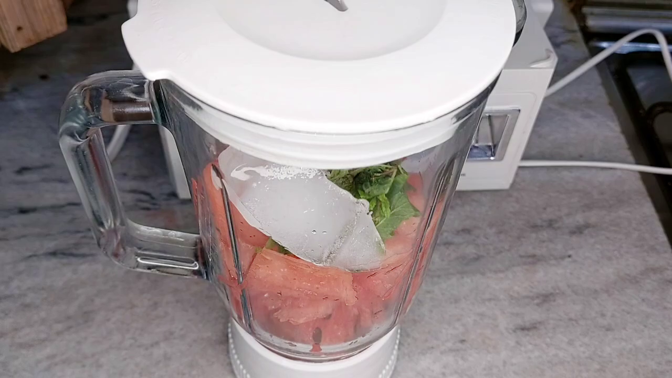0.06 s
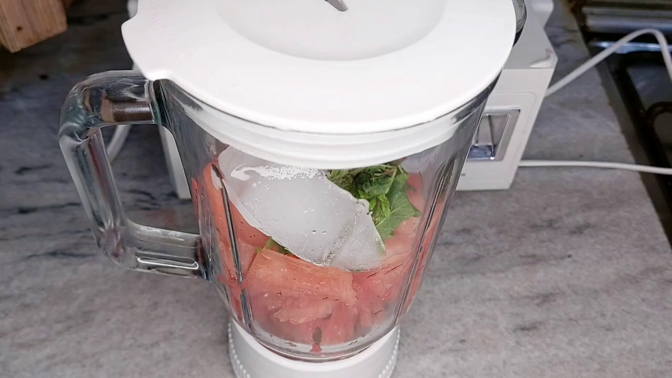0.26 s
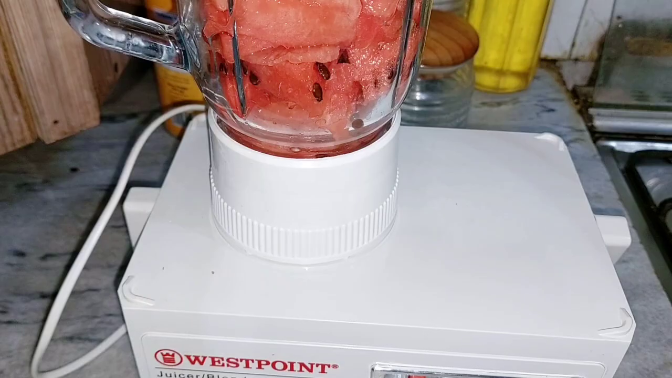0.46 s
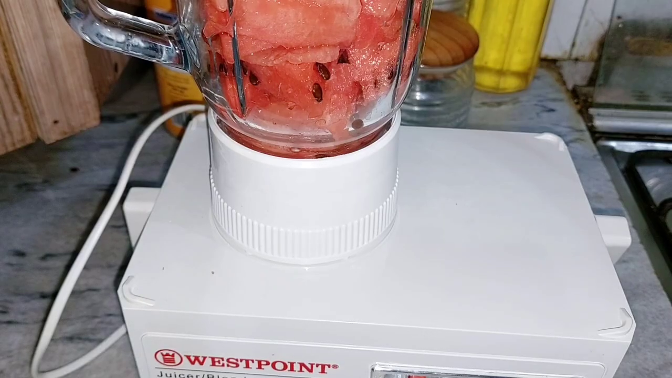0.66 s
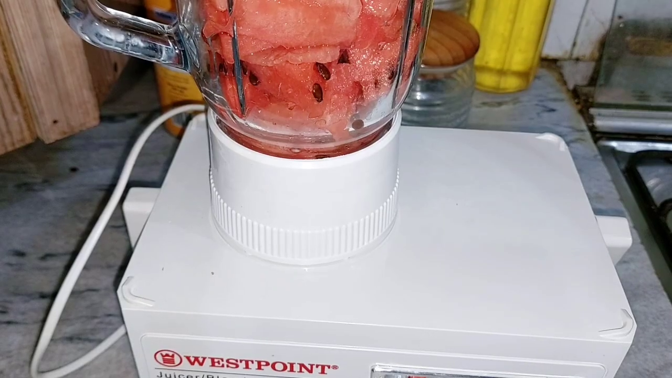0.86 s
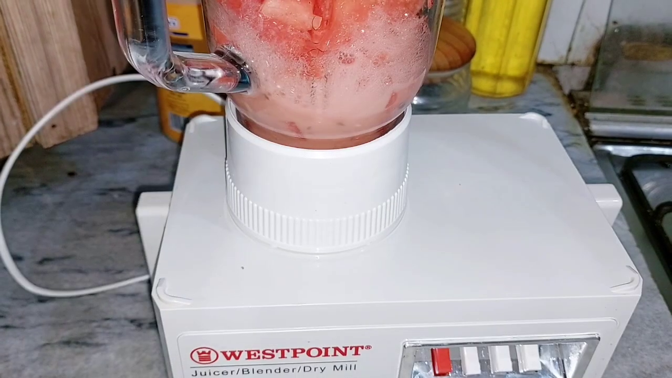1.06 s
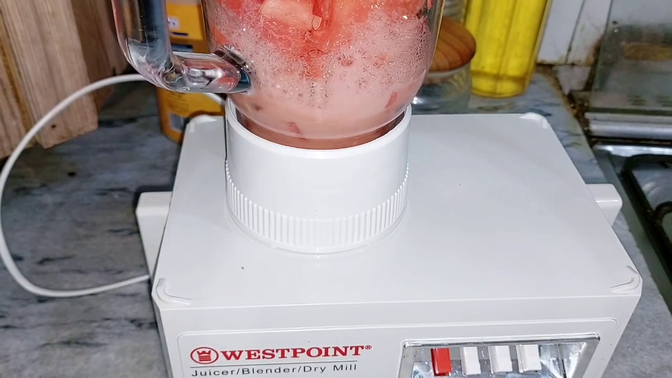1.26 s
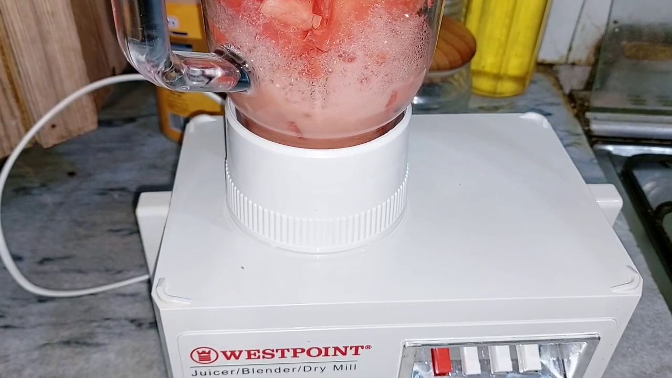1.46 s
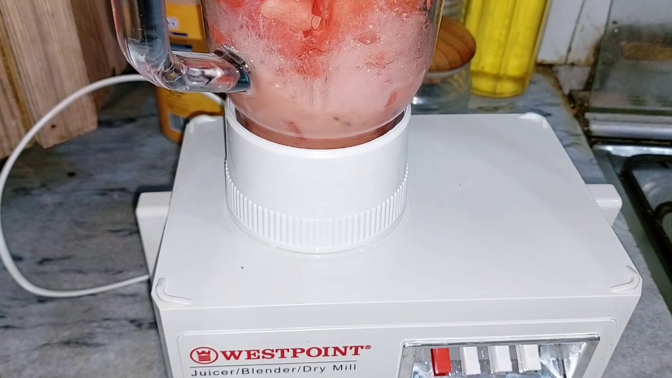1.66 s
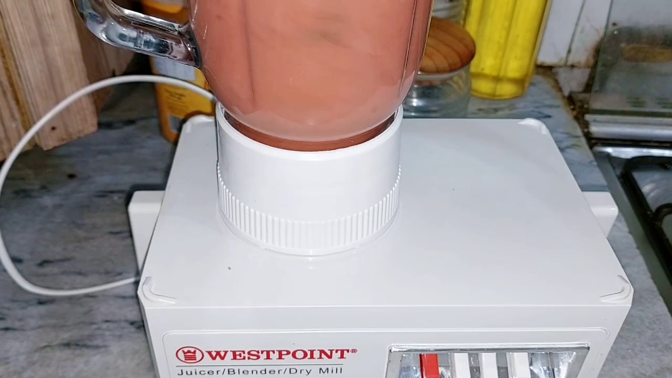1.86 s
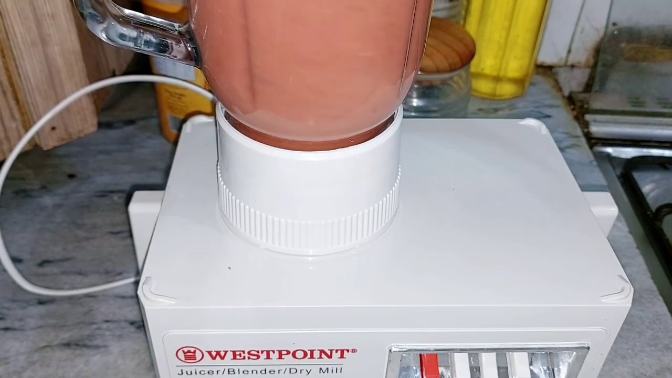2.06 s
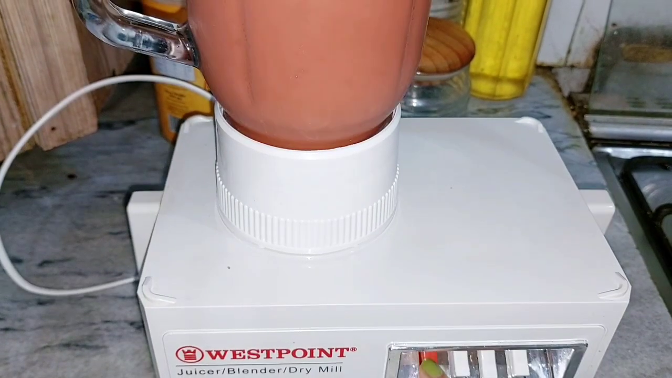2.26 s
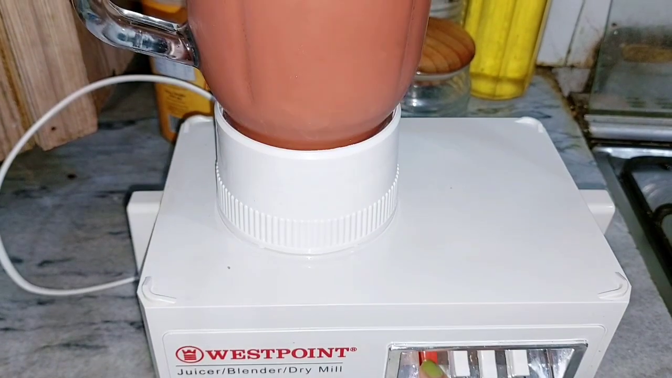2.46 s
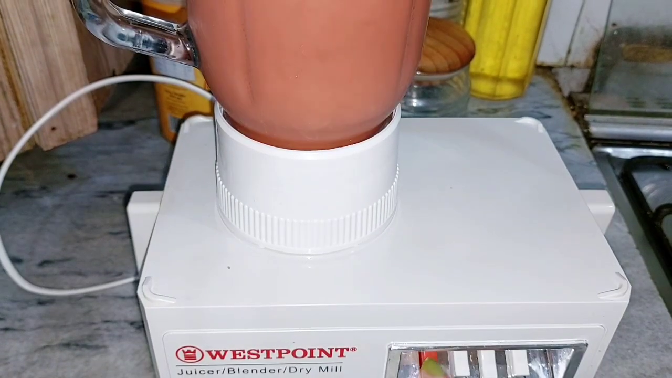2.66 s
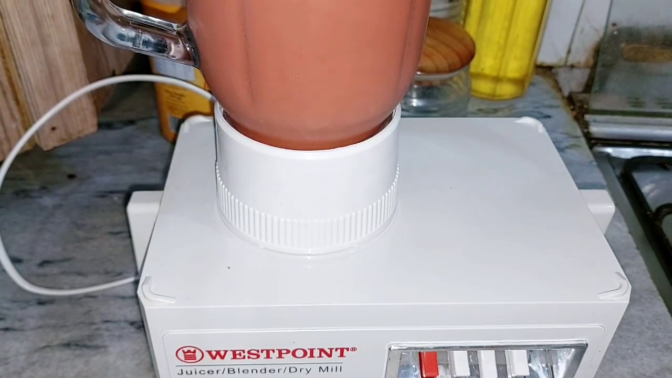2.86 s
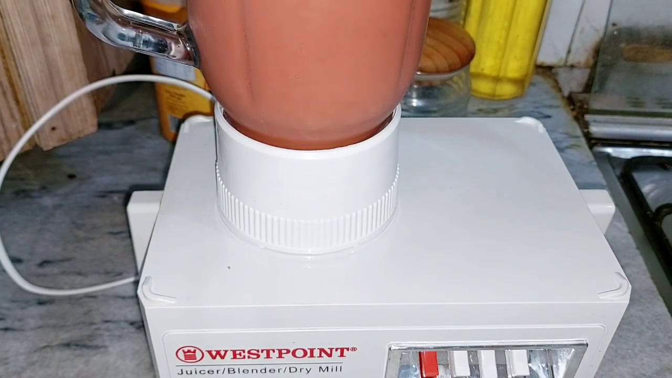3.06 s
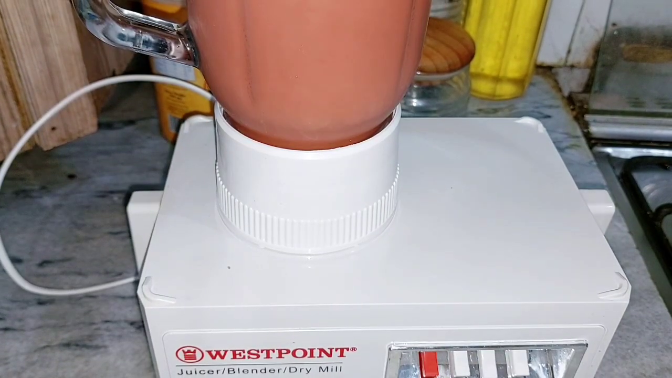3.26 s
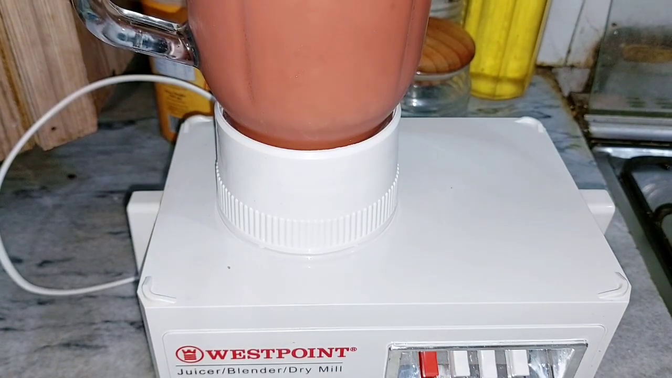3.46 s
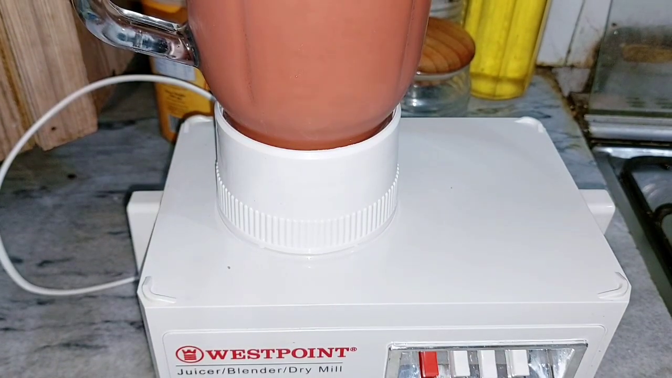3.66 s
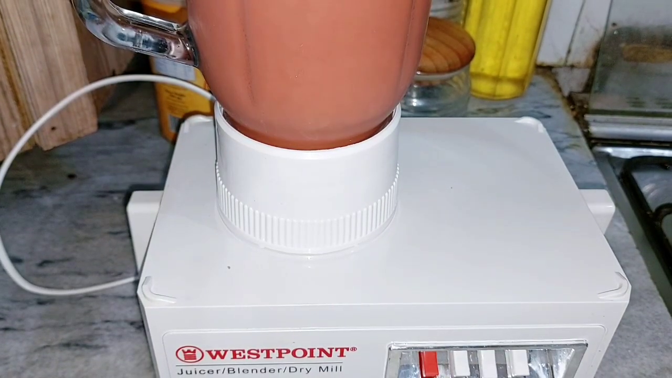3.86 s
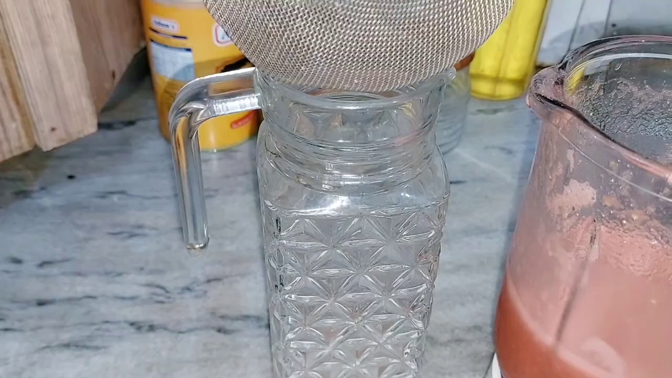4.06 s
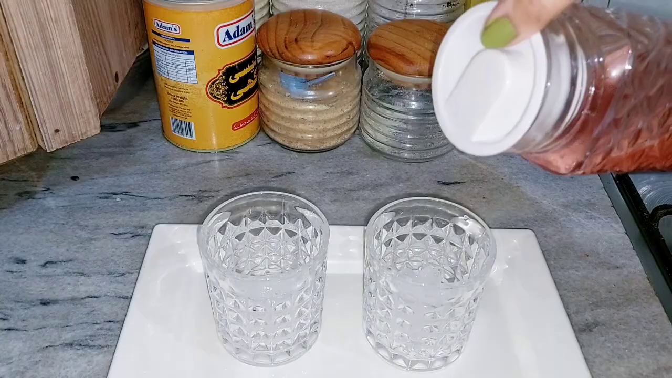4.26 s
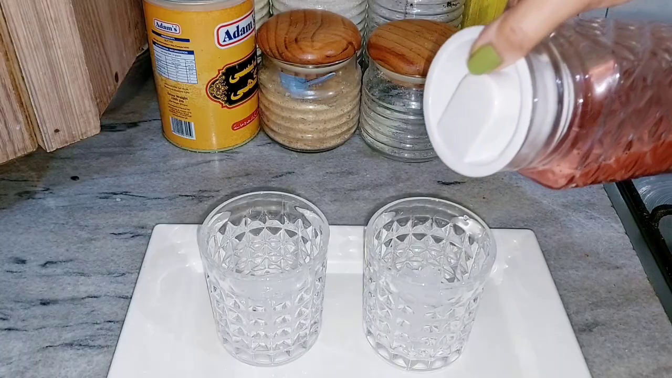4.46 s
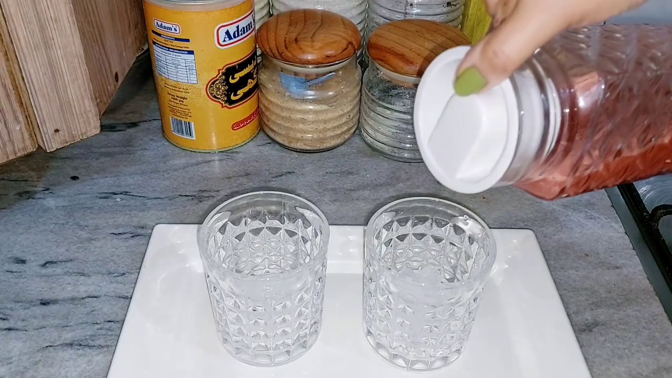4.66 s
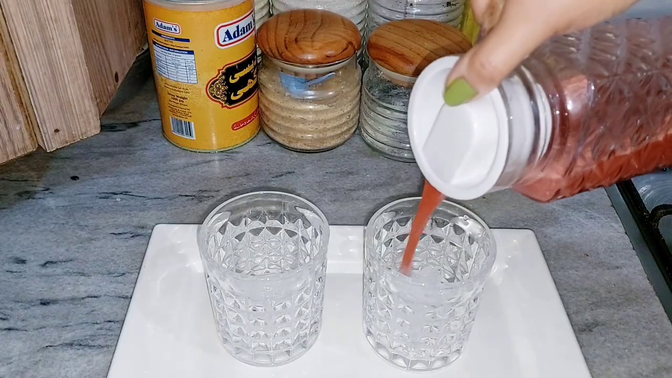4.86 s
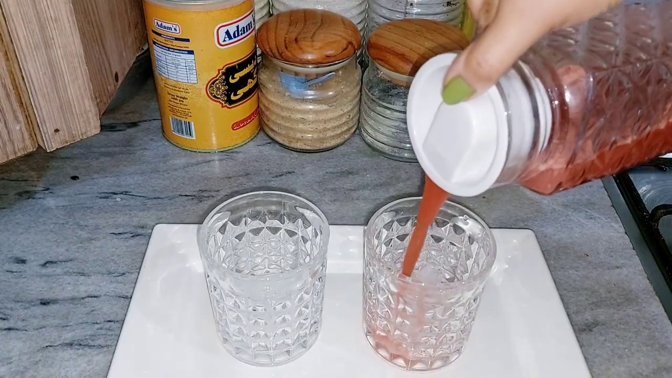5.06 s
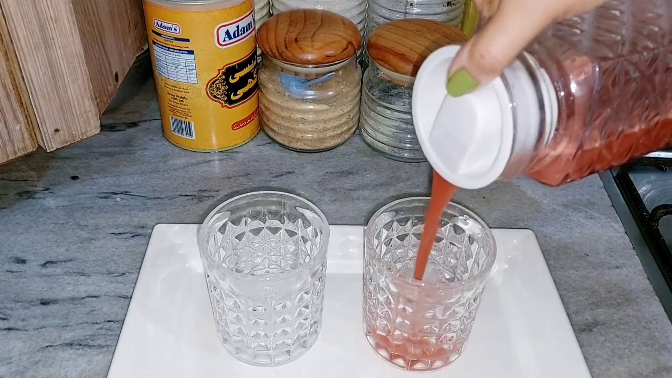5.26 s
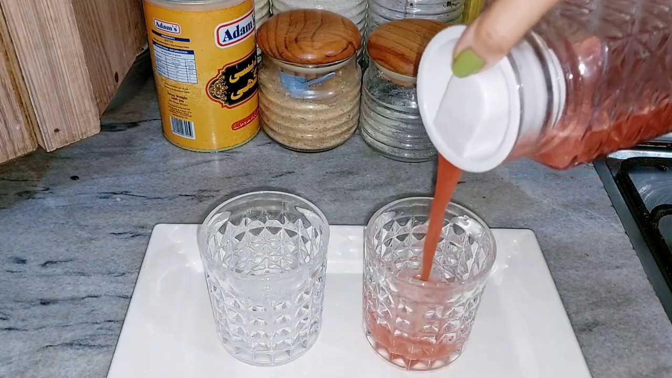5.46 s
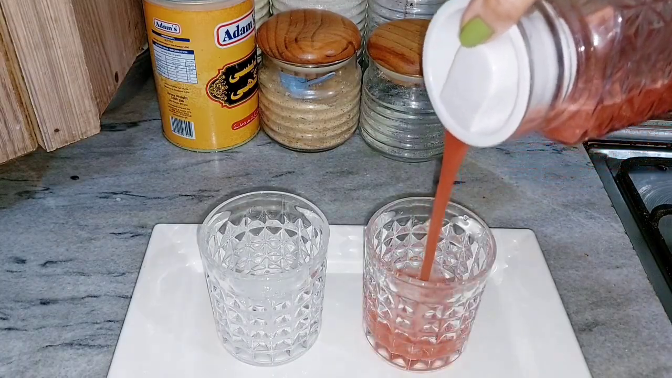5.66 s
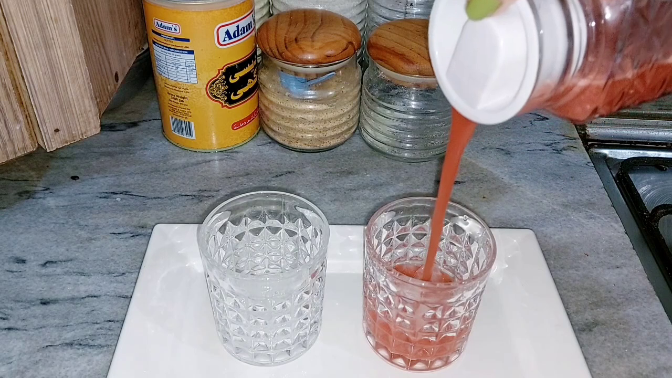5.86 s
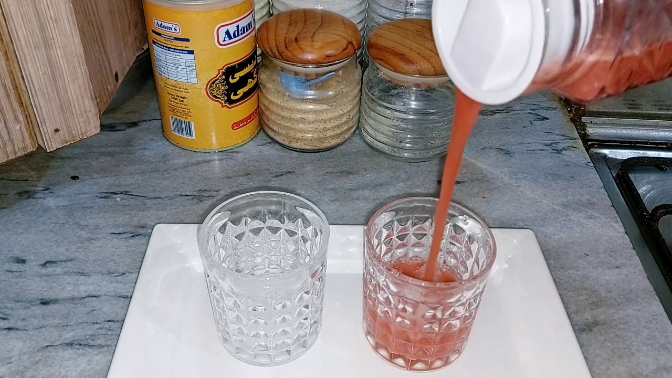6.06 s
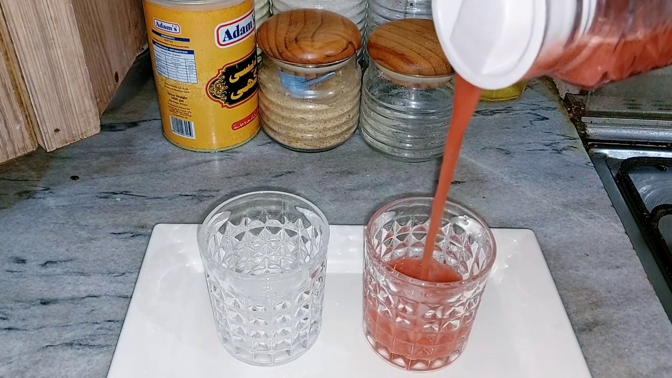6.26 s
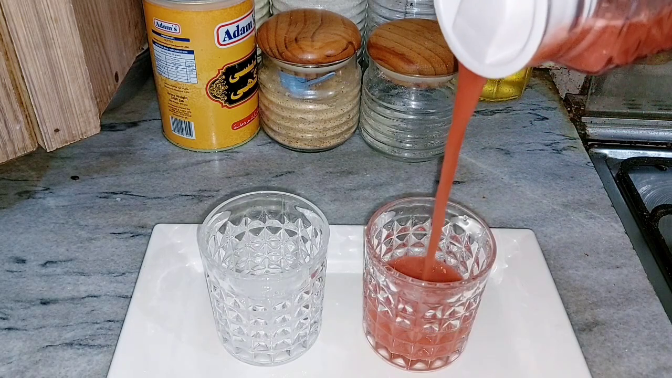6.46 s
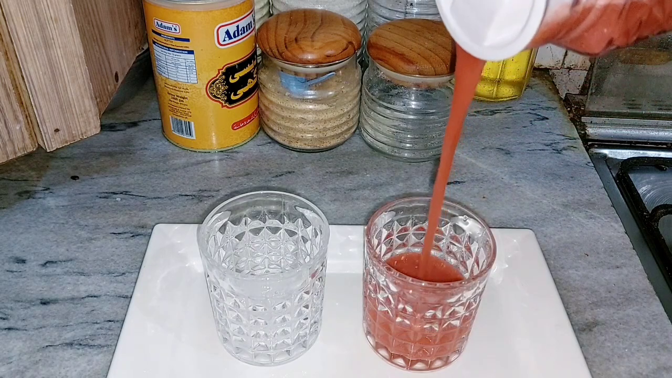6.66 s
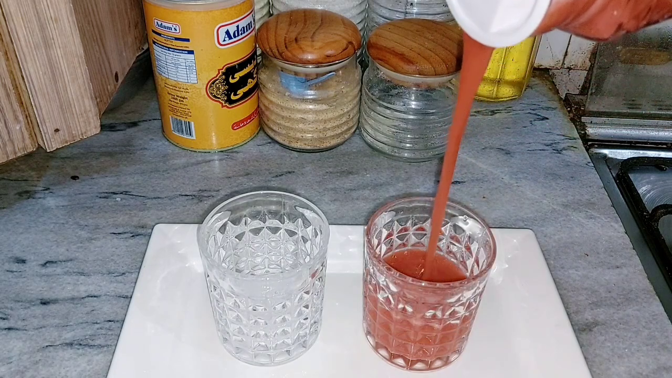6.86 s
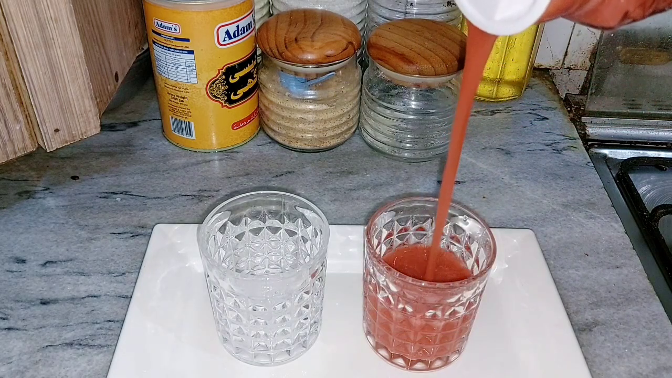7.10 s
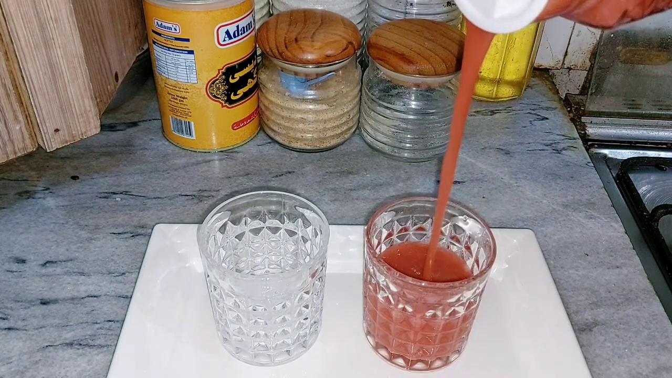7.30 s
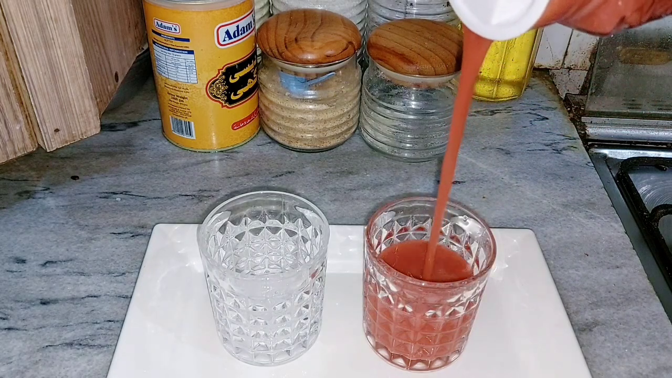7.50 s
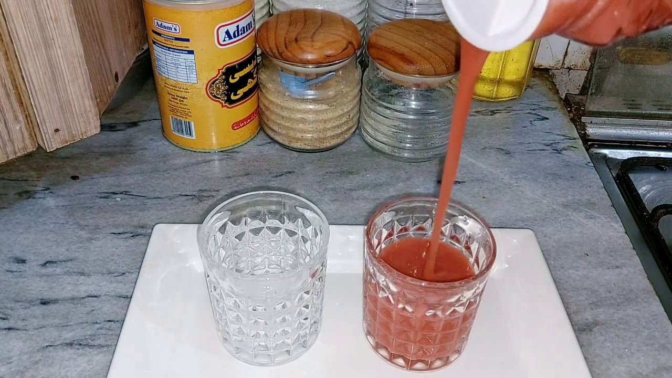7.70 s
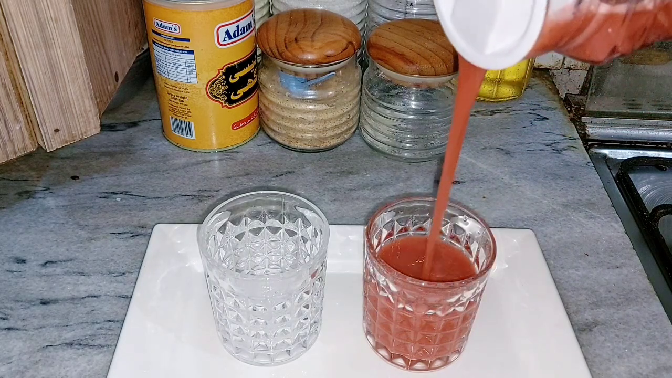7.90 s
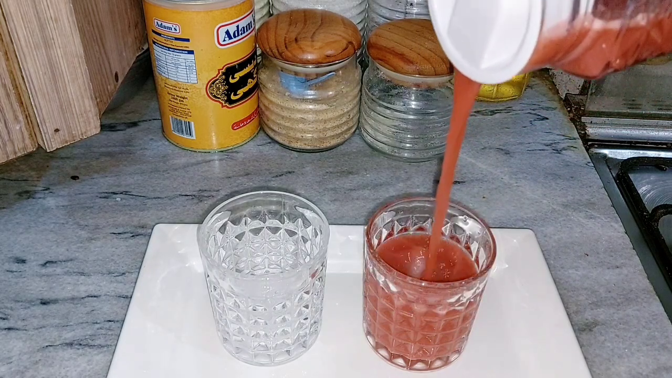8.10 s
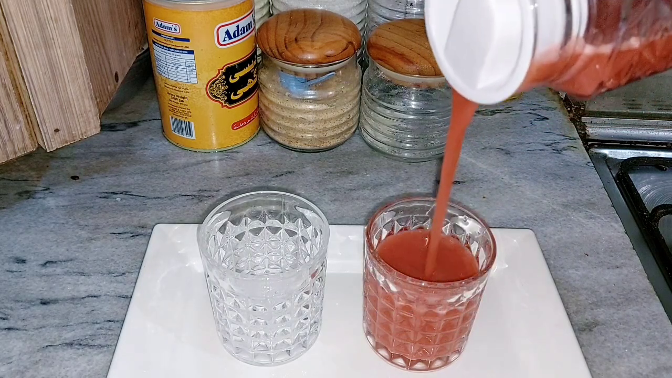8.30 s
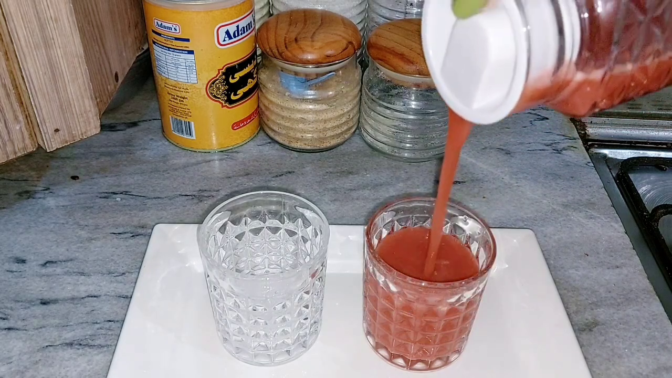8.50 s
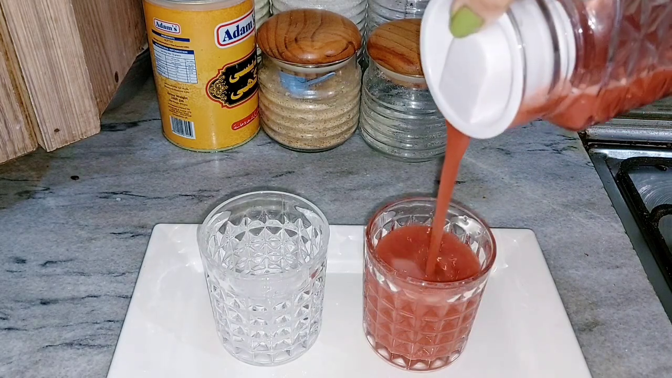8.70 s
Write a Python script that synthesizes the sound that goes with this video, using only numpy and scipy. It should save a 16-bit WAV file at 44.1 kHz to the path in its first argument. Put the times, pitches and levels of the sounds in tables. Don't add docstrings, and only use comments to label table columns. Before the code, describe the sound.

From 0 to 0.9 s a quiet kitchen drones, with low throbbing hum and soft, high steam puffs about three times a second; a tiny falling squeak comes near 0.76. At 0.94 a loud blender cuts in, a buzzing motor with coarse wet churning and bright hiss. At 1.8 the pitch steps up and ice rattles in short knocking bursts, the sharpest crack near 2.16. From 2.3 it runs slightly higher, a dense liquid whirl with small surges; a rising whistly tone lasts from 3.56 to 3.9. At 4.0 it stops abruptly. The quiet hum and pulsing steam return. Faint crisp splash ticks come at 5.2 to 5.5, then from 6.75 irregular watery plops in a glass, the strongest near 7.1, continuing until about 8.5. The hum swells around 5.5 and sinks in pitch late, ending at 8.7.

```python
import sys
import numpy as np
from scipy import signal
from scipy.io import wavfile
from scipy.ndimage import uniform_filter1d

SR = 44100
rng = np.random.default_rng(int(sys.argv[2]) if len(sys.argv) > 2 else 0)


def wrap_up_sound(samples):
    columns = np.atleast_2d(samples).T
    tamed = np.clip(columns, -1, 1)
    steps = np.round(tamed * 32767).astype(np.int16)
    wavfile.write(sys.argv[1], SR, steps)


def field_ratio(decibels):
    return 10 ** (np.asarray(decibels, dtype=float) / 20)


N = 385377

CUTS_S = [
    0,
    0.944,
    1.79,
    2.29,
    4.025,
    4.225,
    8.74,
]

# (frequency [Hz], density [dB/Hz])
DRONE = [(15, -40), (25, -25), (48, -8), (75, -7.5), (131, 0), (193, -10), (402, -6), (455, -10), (494, -9),
         (790, -17), (1030, -11), (1370, -21), (3300, -30.5), (4290, -59), (7260, -120)]
# (start [dB], end [dB])
DRONE_ENDS_DB = [
    (-45, -46),
    (-44, -43),
    (-48.5, -45),
]
# (frequency [Hz], width [Hz], boost [dB])
ROOM_MODES = [(79, 16, -10), (96.7, 7.5, 5), (119.5, 6.7, 5.5), (143.6, 10.2, 7.5), (162, 9, 2.5),
              (230.4, 14, 6), (318, 10, 3), (405, 16, 8.5), (490, 14, 9), (644, 22, 3.5)]
# (frequency [Hz], likeness [0-1])
KITCHEN_SAME = [(60, 0.75), (130, 0.97), (290, 0.94), (640, 0.65), (1410, 0.44), (3100, 0.04),
                (6820, 0.028), (15000, -0.097)]
# (frequency [Hz], L-R [dB])
KITCHEN_PAN = [(60, -1), (130, 0.5), (290, -2), (640, -3), (1410, 1.5), (3100, -3), (6820, -2), (15000, -7)]
# (time [s], pitch [Hz])
HUM = [(0, 54), (4.3, 55.7), (5.7, 54), (6, 53.2), (7.7, 53), (8.2, 49.23), (8.74, 49.1)]
# (time [s], strength [dB], half width [s])
HUM_SWELLS = [
    (.6, 9.5, 0.29),
    (4.3, 5, .15),
    (5.55, 10, 0.59),
    (6.6, 7.5, .6),
    (7.3, 6, .3),
    (8.31, 9, .08),
    (8.58, 4, .08),
]
# (time [s], strength [dB])
CHUFFS = [(-.2, 2.5), (.05, 4), (.345, 0.5), (.515, 1.5), (.83, 1.5), (4.02, 1), (4.222, -2), (4.54, -1.7),
          (4.84, -0.5), (5.145, 1), (5.45, -0.3), (5.75, 0.6), (6.04, 0.5), (6.339, 1), (6.65, 1),
          (6.94, 0.9), (7.24, 0.5), (7.535, 1.5), (7.85, 1), (8.15, 1), (8.47, -0.5)]
# (frequency [Hz], density [dB/Hz])
STEAM_LOW = [(1530, -8), (2600, -11), (2670, -10.5), (3350, -9), (3650, -1), (4500, -2.5), (5390, -11),
             (7000, -20), (9100, -21), (15400, -120)]
STEAM_TOP = [(3240, -31), (5500, -9), (7560, -9.5), (8860, -13.5), (10200, -7), (11000, -8.5), (12000, -3),
             (13400, -4), (15000, 4.5), (15400, 6.5), (15780, 5.5), (15950, -40)]
# (peak [dB], rise [s], rise depth [dB], hold [s], sag [dB/s], share of strength)
STEAM_LOW_SHAPE = (-56.8, .07, 5.5, .05, 38, .9)
STEAM_TOP_SHAPE = (-52, .11, 5.5, .09, 52, 1.1)
# (frequency [Hz], width [Hz], boost [dB])
VALVE = [(3618, 25, 2), (3750, 40, 2.5), (4095, 30, 4), (4250, 50, 1.5)]
# (start [s], end [s], a loud moment [s], beat period [s])
THROBS = [
    (0, .944, .115, .195),
    (.944, 1.79, 1.105, .194),
    (2.29, 4.025, 2.83, .284),
    (4.225, 6.4, 4.98, .19),
    (6.4, 8.74, 8.59, .1902),
]
# (first [dB rms], last [dB rms])
THROB_ENDS_DB = [
    (-46, -47),
    (-47, -45.5),
    (-43, -45),
    (-50, -50),
    (-48, -41.5),
]
# (time [s], length [s], first pitch [Hz], last pitch [Hz], level [dB rms])
GLIDES = [
    (.757, .062, 15600, 11050, -55),
    (3.56, 0.32, 1514, 1823, -30),
    (4.166, 0.07, 645, 630, -47.5),
]

# (time [s], speed [Hz])
SPEEDS = [
    [(.95, 197), (1.08, 194.5), (1.15, 195), (1.3, 194), (1.5, 193.6), (1.6, 194), (1.78, 192.3)],
    [(1.8, 238.6), (2.1, 238.4), (2.18, 237.5), (2.28, 238.6)],
    [(2.3, 245.8), (2.8, 246.2), (3.1, 246.7), (4, 246.5)],
]
# (multiple of shaft speed, level [dB rms])
ORDERS = [
    [(1, -42), (2, -48.5), (3, -41.5), (4, -39.5), (5, -31), (7, -37), (8, -38), (9, -36), (12, -53),
     (24, -62), (27, -58)],
    [(1, -31), (3, -35), (4, -43), (7, -41), (17, -54.5), (24, -63)],
    [(1, -31.5), (2, -41), (3, -30), (4, -39.5), (5, -54), (7, -46), (16, -51), (24, -50), (48, -54)],
]
# (churn [dB], air and brush hiss [dB], brush sizzle [dB])
LOADS_DB = [
    (-21.5, -31, -33),
    (-22.5, -27.5, -36),
    (-21, -32, -34.5),
]
# (time [s], strength [dB])
SURGES = [(.975, 0.5), (1.06, -1), (1.9, 2), (2.02, -2.5), (2.065, 1), (2.19, 0.5), (2.39, 2), (2.68, 1.5),
          (2.98, 2), (3.23, 2), (3.32, 0), (3.46, 3.5), (3.54, 2), (3.76, 1.5)]
# (frequency [Hz], density [dB/Hz])
CHURNS = [
    [(35, -65), (60, -35), (92, -10.5), (161, -14), (188, -12), (512, -16), (567, -17.5), (867, -8),
     (950, 0), (1180, -8.5), (1600, -5), (3500, -16.5), (4550, -59), (7700, -120)],
    [(35, -74), (60, -38), (92, -16.5), (191, -21), (238, -19), (307, -13.5), (486, -15), (695, -14),
     (770, -14.5), (1470, -5.5), (1630, -7.5), (3500, -23), (4550, -52), (7700, -120)],
    [(35, -66), (60, -55), (92, -10), (201, -16), (242, -12.5), (313, -10.5), (607, -10.5), (719, -10.5),
     (800, -8), (961, -6), (1600, -4), (3500, -21), (4550, -63), (7700, -120)],
]
# (frequency [Hz], density [dB/Hz])
HISSES = [
    [(1650, -14.5), (2800, -7.5), (3800, -7.5), (4870, -5.5), (5150, -6.5), (5500, -4.5), (7680, -7),
     (8480, -11.5), (9640, -6), (10900, -8), (13500, -1), (15300, -9)],
    [(1650, -34), (2800, -5.5), (3620, -10), (4700, -6), (5150, -1), (5700, -12), (6480, -12), (9170, -20),
     (13100, -13.5), (15300, -16)],
    [(1650, -41), (2800, -5.5), (3640, -6.5), (4800, -4), (5270, -2), (6210, -5), (7680, -6), (8420, -11),
     (11200, -9.5), (13200, -3.5), (15300, -10)],
]
# (frequency [Hz], width [Hz], boost [dB])
HOUSING = [(77, 24, -11), (100, 13, 0.5), (282, 49, 9), (374, 73, 6.5), (692, 25, 5.5), (954, 44, 5.5),
           (1320, 37, 1), (1607, 57, 7), (1760, 110, 3), (1950, 120, 6), (2340, 48, 5.5), (12200, 500, 3),
           (13400, 500, 0)]
# (frequency [Hz], width [Hz], boost [dB])
FILLING = [
    [(684, 20, 5.5), (828, 25, 5), (5270, 76, 5), (13500, 300, 2)],
    [(5080, 60, 3), (5240, 60, 4.5), (687, 25, -3), (13450, 250, 6), (12300, 300, 2)],
    [(1590, 48, -2), (380, 87, 2), (1226, 210, 1.5), (5160, 160, 6), (11870, 150, 3.5), (12550, 300, -2),
     (13220, 150, -4), (13420, 250, 3), (14300, 900, -1), (8800, 1000, -2.5), (8820, 150, 6)],
]
# (frequency [Hz], level [dB rms])
RINGS = [
    [(1565, -37), (1750, -43)],
    [(686, -39), (1575, -39), (1628, -35), (5110, -40)],
    [(1610, -44), (1760, -47)],
]
# (frequency [Hz], likeness [0-1])
BLENDER_SAME = [(60, 0.98), (130, 0.75), (290, 0.94), (640, 0.8), (1410, 0.48), (3100, 0.46), (6000, 0.3),
                (9500, 0.023)]
# (frequency [Hz], L-R [dB])
BLENDER_PAN = [(60, -10), (130, 2), (290, -2), (640, -1), (1410, 1.5), (3100, -2.5), (6820, -2.5),
               (15000, -5)]
# (first L-R [dB], last L-R [dB])
LEANS_DB = [
    (.5, 0.9),
    (.9, 0.5),
    (1.8, -1.5),
]
# (time [s], peak [dB], length [s], share of plain grit [0-1], lateness of peak)
ICE = [
    (1.824, -13.5, 0.026, 0.4, 1.4),
    (1.872, -16.5, 0.024, 0.54, 1.5),
    (1.912, -21, 0.022, 0.7, 1.4),
    (1.974, -12.5, 0.011, 0.3, 1.4),
    (2.031, -12, 0.042, 0.46, 1.2),
    (2.117, -14, 0.018, 0.75, .35),
    (2.1633, -3.5, .0285, 0.3, 2.4),
    (2.222, -12.5, 0.0085, 0.46, .6),
    (2.267, -19, 0.022, 0.7, 1.4),
    (2.32, -21, 0.0061, 0.3, 1.4),
]
# (frequency [Hz], level [dB], t60 [s])
JAR = [(675, 0, 0.04), (930, -0.5, 0.036), (1086, 0, 0.026), (1312, -2, 0.03), (1634, 6, 0.015),
       (2300, 2.5, 0.017), (2994, -0.5, 0.01), (3950, 0, 0.0075), (4994, -6, 0.019), (6400, 0.5, 0.0045),
       (8100, -7, .004)]

# (time [s], peak [dB], pitch [Hz], L-R [dB])
PLOPS = [(4.8298, -42, 2300, 0.5), (6.7516, -33.5, 1374, -2.0), (6.7984, -34.5, 1472, -3.5),
         (6.8114, -37, 1440, 4), (6.8274, -46, 1520, 2.5), (6.8902, -39, 1600, 1.5),
         (6.9526, -30.5, 1490, -1), (7.0795, -34.5, 1960, 3), (7.1169, -20, 1780, 0),
         (7.1444, -34, 1650, 1), (7.1694, -39, 1970, 0.0), (7.2265, -42, 1460, 1.0),
         (7.5697, -42, 1680, -1.0), (7.6415, -38.5, 1510, -8), (7.764, -43, 1950, 8),
         (7.7817, -32, 1560, -3.0), (7.8486, -43, 1810, 0.5), (7.9349, -42, 1510, -2.5),
         (8.0475, -37.5, 1720, 2), (8.073, -35, 1400, 1), (8.081, -31.5, 1380, -1), (8.1304, -40, 1600, 6),
         (8.2223, -37, 1820, -1.5), (8.2624, -36, 2340, -3), (8.312, -30.5, 1923, 1),
         (8.447, -43, 1780, -2.0), (8.4936, -44, 1840, 0.5), (8.5413, -40, 1270, 0.5)]
# (time [s], peak [dB], pitch [Hz], L-R [dB])
OVERTONES = [(6.887, -36, 2300, 1.5), (6.812, -45, 2000, .4), (7.118, -28.5, 770, .3),
             (7.119, -38, 2700, .3), (8.268, -32, 1470, -.4), (6.752, -41, 1800, -2), (8.313, -36, 1400, 0),
             (7.496, -45, 1650, 0), (7.792, -44, 1450, 0), (8.09, -40, 1750, 0), (8.228, -40, 1900, 0),
             (8.548, -42, 1700, 0), (7.155, -42, 2000, 0), (7.176, -41, 1300, 0), (8.3125, -37, 3100, -.4),
             (8.553, -43, 2100, 1.5), (5.5, -50, 2000, .4)]
# (time [s], peak [dB], pitch [Hz])
SPITS = [
    (5.157, -40, 7500),
    (5.1652, -36, 10000),
    (5.172, -39, 7300),
    (5.1841, -35, 10500),
    (5.194, -38, 7000),
    (5.2839, -39, 10300),
    (5.3084, -25, 12300),
    (5.3837, -32, 10300),
    (5.4171, -35, 11000),
    (5.452, -33, 10200),
]
# (frequency [Hz], level [dB], t60 [s])
GLASS = [(829.5, 0, 0.028), (1460, 4, 0.025), (1950, -3, 0.04), (2300, -12, .04), (3430, -12, .04),
         (4900, -10, .015), (7750, -1.5, .012)]

DRONE_SETTLE_S, DRONE_LAG_S = 1.4, -0.0003
HUM_DB, HUM_BEAT, THROB_HZ = -57.5, .4, 101.8
WHINE_HZ, WHINE_DB = 2757, -75
PORT_LAG_S = .00008
SURGE_HALF_S, SURGE_HISS, SURGE_SIZZLE = 0.037, 1, .1
WARM_FROM_S, WARM_S, WARM_DB, CREEP_DB_PER_S = 3.46, 0.086, 2.5, -0.3
BUBBLE_RING_S, BUBBLE_RISE_S = .026, .0017
EDGE_HZ = 15890


def evened(x):
    return x / np.sqrt(np.mean(x ** 2) + 1e-20)


def read(points, hz):
    f, value = np.transpose(points)
    return np.interp(np.log(hz + 1), np.log(f + 1), value)


def add(mix, s, sound):
    part = mix[:, round(s * SR):][:, :sound.shape[-1]]
    part += sound[..., :part.shape[1]]


def clock(cut):
    return np.arange(round(CUTS_S[cut] * SR), round(CUTS_S[cut + 1] * SR)) / SR


def curve(rows, cut):
    s, value = np.transpose(rows)
    return np.interp(clock(cut), s, value)


def bump(t, s, half_s):
    return np.exp(-((t - s) / half_s) ** 2)


def band(order, edges_hz, kind, x, filt=signal.sosfilt):
    return filt(signal.butter(order, edges_hz, kind, fs=SR, output="sos"), x)


def noise(length, colour, modes, same, pan, patchy_db, flicker_db, ripple_db, size=1024, lag_s=0):
    frames, hz = 4 * length // size + 5, np.fft.rfftfreq(size, 1 / SR)
    a, b, c, d, patches = rng.standard_normal((frames, len(hz), 5)).T
    patches = uniform_filter1d(patches, size=10, axis=0)
    patches = evened(uniform_filter1d(patches, size=8, axis=1))
    gusts = evened(uniform_filter1d(rng.standard_normal(frames), size=4))
    fixed = uniform_filter1d(rng.standard_normal((3, len(hz))), size=2, axis=1)
    ripple, ripple_right, skew = (evened(v) for v in fixed)
    db = read(colour, hz)
    for f, width, boost in modes:
        db = db + boost / (1 + (2 * (hz - f) / width) ** 2)
    like = np.clip(read(same, hz), .02, 1)
    share = np.maximum(like, .56)
    turn = np.exp(1j * np.sqrt(2 * np.log(share / like)) * skew - 2j * np.pi * hz * lag_s)
    left = a + 1j * b
    right = (share * turn)[:, None] * left + np.sqrt(1 - share ** 2)[:, None] * (c + 1j * d)
    z = np.array([left, right]) * field_ratio(db[:, None] + patchy_db * patches + flicker_db * gusts)
    sides_db = np.outer([.5, -.5], read(pan, hz))
    sides_db += ripple_db * np.array([ripple, like * ripple + (1 - like) * ripple_right])
    z *= field_ratio(sides_db)[:, :, None]
    sound = signal.istft(z, nperseg=size, noverlap=3 * size // 4)[1]
    return evened(sound[:, :length])


def shaft(turns, orders, waver_db, lean_db, lag):
    out = np.zeros((2, len(turns)))
    at = np.arange(len(turns)) / 200
    for k, db in orders:
        slow = uniform_filter1d(rng.standard_normal((3, len(turns) // 200 + 30)), size=12, axis=1)
        swell, slip, lean = (np.interp(at, np.arange(len(v)), evened(v)) for v in slow)
        phase = 2 * np.pi * (round(k) * turns + rng.random()) + lag * np.sqrt(k) * slip
        far = rng.normal(0, 0.324 * np.sqrt(k))
        line = np.array([field_ratio(lean_db * lean) * np.sin(phase), np.sin(phase + far)])
        out += np.sqrt(2) * field_ratio(db + waver_db * swell) * line
    return out


def ringing(modes, length):
    t = np.arange(length) / SR
    return sum(field_ratio(db - 60 * t / t60) * np.sin(2 * np.pi * hz * t) for hz, db, t60 in modes)


def room(x, t60, first_s):
    at = np.arange(round(first_s * SR), SR // 2, 20)
    taps = np.zeros((2, SR // 2 + 20))
    for side in taps:
        sign = rng.choice([-1., 1.], len(at))
        side[at + rng.integers(0, 20, len(at))] = sign * field_ratio(-60 * at / SR / t60)
    taps = signal.lfilter([1], [1, -.5], taps)
    return signal.oaconvolve(x, taps / np.linalg.norm(taps[0]), axes=1)[:, :N]


def chuffing(t, peak_db, rise_s, depth_db, hold_s, sag_db_per_s, share):
    s, db = np.transpose(CHUFFS)
    last = np.searchsorted(s, t) - 1
    since = t - s[last]
    level_db = share * db[last] - depth_db * np.maximum(1 - since / rise_s, 0)
    level_db -= sag_db_per_s * np.maximum(since - rise_s - hold_s, 0)
    return peak_db + uniform_filter1d(level_db, size=600)


def kitchen(cut, drone_ends_db):
    t, place = clock(cut), (KITCHEN_SAME, KITCHEN_PAN)
    n = len(t)
    first_db, last_db = drone_ends_db
    drone_db = last_db + (first_db - last_db) * np.exp(-(t - t[0]) / DRONE_SETTLE_S)
    drone = noise(n, DRONE, ROOM_MODES, *place, patchy_db=0.7, flicker_db=0.33, ripple_db=1.0,
                  size=4096, lag_s=DRONE_LAG_S)
    drone = evened(drone + 0.058 * (drone ** 2 - 1))
    hum_db = HUM_DB + sum(db * bump(t, s, half_s) for s, db, half_s in HUM_SWELLS)
    hum = np.sqrt(2) * np.sin(2 * np.pi * np.cumsum(curve(HUM, cut)) / SR)
    hum *= 1 + HUM_BEAT * np.cos(2 * np.pi * (t - 5.51) / THROBS[-1][-1])
    whine = shaft(WHINE_HZ * t, [(1, WHINE_DB)], waver_db=2, lean_db=2, lag=.4)
    low = noise(n, STEAM_LOW, VALVE, *place, patchy_db=1.3, flicker_db=1.37, ripple_db=2.2)
    top = noise(n, STEAM_TOP, [], *place, patchy_db=1.5, flicker_db=0.8, ripple_db=0.5)
    sound = field_ratio(drone_db + 5.0) * drone + field_ratio(hum_db) * hum + whine
    sound += field_ratio(chuffing(t, *STEAM_LOW_SHAPE) + 7.5) * low
    sound += field_ratio(chuffing(t, *STEAM_TOP_SHAPE) + 7.0) * top
    return CUTS_S[cut], sound * signal.windows.tukey(n, 60 / n)


def throb():
    out = np.zeros((2, N))
    for (start, end, loud_s, period_s), ends_db in zip(THROBS, THROB_ENDS_DB):
        t = np.arange(round(start * SR), round(end * SR)) / SR
        beat = np.cos(np.pi * (t - loud_s) / period_s) * field_ratio(np.linspace(*ends_db, len(t)))
        tone = np.sin(2 * np.pi * THROB_HZ * t + [[0], [.35]]) * field_ratio(np.array([[-1.6], [-.4]]))
        add(out, start, np.sqrt(2) * beat * tone * signal.windows.tukey(len(t), .05))
    return out


def glides():
    out = np.zeros((2, N))
    for (s, length_s, first_hz, last_hz, db), haste in zip(GLIDES, [4.2, 1.6, 1.5]):
        u = np.arange(round(length_s * SR)) / (length_s * SR)
        left_to_go = (np.exp(-haste * u) - np.exp(-haste)) / (1 - np.exp(-haste))
        hz = last_hz + (first_hz - last_hz) * left_to_go
        fuzz = evened(uniform_filter1d(rng.standard_normal((2, len(u))), size=300, axis=1))
        tone = np.sin(2 * np.pi * np.cumsum(hz) / SR + 0.81 * fuzz) * field_ratio(3 * fuzz[::-1])
        add(out, s, np.sqrt(2) * field_ratio(db) * tone * signal.windows.tukey(len(u), .4))
    return out


def load_of(cut, churn_db, hiss_db, sizzle_db):
    t = clock(cut)
    surge_db = sum(db * bump(t, s, SURGE_HALF_S) for s, db in SURGES)
    warm_db = WARM_DB * np.clip((t - WARM_FROM_S) / WARM_S, 0, 1) + CREEP_DB_PER_S * (t - t[0])
    return churn_db + surge_db, hiss_db + SURGE_HISS * surge_db, sizzle_db + SURGE_SIZZLE * surge_db + warm_db


def blender(cut, speed, load_db, orders, churn, hiss, rings, filling, lean_db):
    churn_db, hiss_db, sizzle_db = load_of(cut, *load_db)
    turns = np.cumsum(curve(speed, cut)) / SR
    n, modes, place = len(turns), HOUSING + filling, (BLENDER_SAME, BLENDER_PAN)
    low = noise(n, churn, modes, *place, patchy_db=1.1, flicker_db=1.0, ripple_db=1.5,
                size=4096, lag_s=PORT_LAG_S)
    low *= 1 + 0.17 * np.cos(2 * np.pi * turns)
    high = noise(n, hiss, modes, *place, patchy_db=2.0, flicker_db=0.27, ripple_db=1.8,
                 size=2048, lag_s=PORT_LAG_S)
    sizzle = band(4, 10500, "highpass", high, signal.sosfiltfilt)
    sound = field_ratio(churn_db - .8) * low
    sound += field_ratio(hiss_db + 1.6) * evened(high - sizzle) + field_ratio(sizzle_db + 2.5) * evened(sizzle)
    sound += shaft(turns, orders, waver_db=1.8, lean_db=1.2, lag=.22)
    sound += shaft(clock(cut), rings, waver_db=3.5, lean_db=2, lag=.045)
    sound *= field_ratio(np.linspace(*lean_db, n) * np.array([[.5], [-.5]]))
    return CUTS_S[cut], sound * signal.windows.tukey(n, 60 / n)


def ice(speed_hz):
    blows = np.zeros((2, N))
    for s, db, length_s, grit, late in ICE:
        t = np.arange(round(length_s * SR)) / SR
        hits = np.diff(np.floor(t * speed_hz), prepend=-1)
        drive = (1 - grit) * hits + grit * 0.16 * rng.standard_normal((2, len(t)))
        swell = np.sqrt(np.sin(np.pi * ((t + 0.001) / (length_s + 0.0017)) ** late))
        add(blows, s, field_ratio(db) * drive * swell)
    jar = ringing(JAR[1::2], length=3000) - ringing(JAR[::2], length=3000)
    jar = band(2, 550, "highpass", jar)
    knocks = signal.oaconvolve(blows, jar[None] / abs(jar).max(), axes=1)[:, :N]
    return knocks + field_ratio(-14.0) * room(knocks, t60=0.1, first_s=0.0034)


def pouring():
    plops, t = np.zeros((2, N)), np.arange(2000) / SR
    glass = ringing(GLASS, length=6000) * np.minimum(np.arange(6000) / (.0012 * SR), 1)
    envelope = field_ratio(-60 * t / BUBBLE_RING_S) * np.sin(np.pi / 2 * np.minimum(t / BUBBLE_RISE_S, 1)) ** 2
    for s, db, hz, pan_db in PLOPS + OVERTONES:
        cycles = hz * (t + 0.00045 * (1 - np.exp(-t / 0.0017)))
        tear = evened(band(2, [0.62 * hz, 1.22 * hz], "bandpass", rng.standard_normal((2, len(t)))))
        body = (np.sin(2 * np.pi * cycles) + 0.69 * tear) * envelope
        add(plops, s, field_ratio(db + 3.0) * field_ratio(np.array([[pan_db / 2], [-pan_db / 2]])) * body)
        add(plops, s, field_ratio(1.46 * db - 7.0) * glass[None])
    for s, db, hz in SPITS:
        tick = rng.standard_normal((2, len(t))) * field_ratio(db + 2.5 - 60 * t / 0.014)
        add(plops, s, band(2, [0.91 * hz, 1.1 * hz], "bandpass", tick))
    return plops + field_ratio(-9.0) * room(plops, t60=0.35, first_s=0.0041)


def scene():
    mix = throb() + glides()
    for stretch in zip([0, 4, 5], DRONE_ENDS_DB):
        add(mix, *kitchen(*stretch))
    for stretch in zip([1, 2, 3], SPEEDS, LOADS_DB, ORDERS, CHURNS, HISSES, RINGS, FILLING, LEANS_DB):
        add(mix, *blender(*stretch))
    return mix + ice(speed_hz=225.2) + pouring()


def low_pass(x):
    return signal.sosfilt(signal.butter(12, 15750, fs=SR, output="sos"), x)


def record(dry):
    thin = band(3, 45, "highpass", dry)
    edge = signal.firwin(1023, EDGE_HZ, window=("kaiser", 10), fs=SR)
    return low_pass(signal.oaconvolve(thin, edge[None], "same"))


dry = scene()
out = record(dry)
wrap_up_sound(out)
```